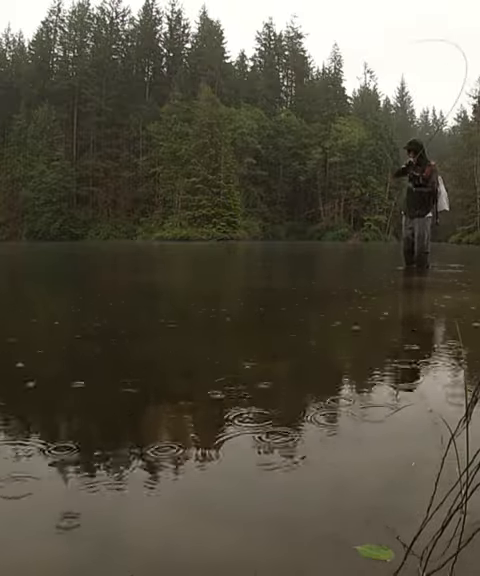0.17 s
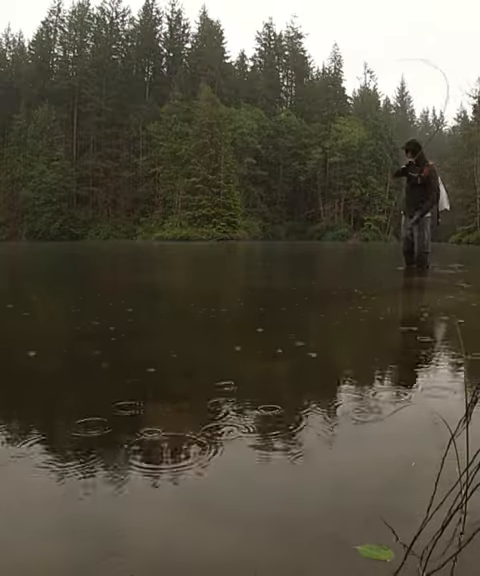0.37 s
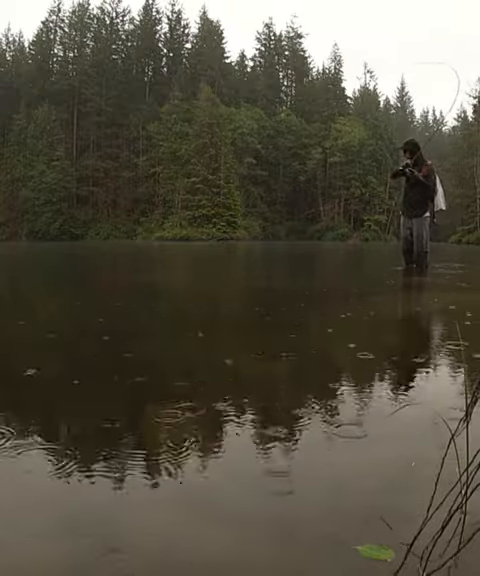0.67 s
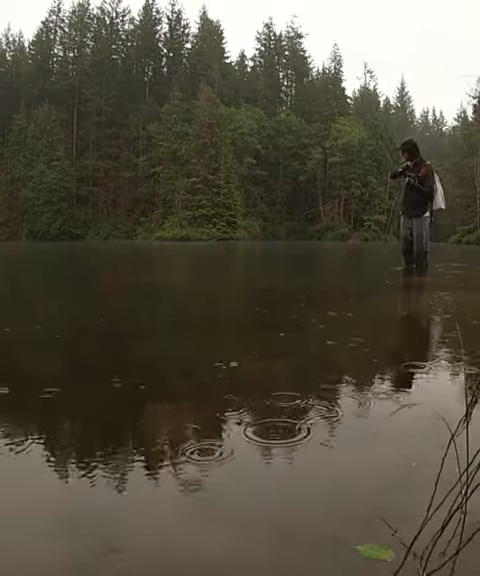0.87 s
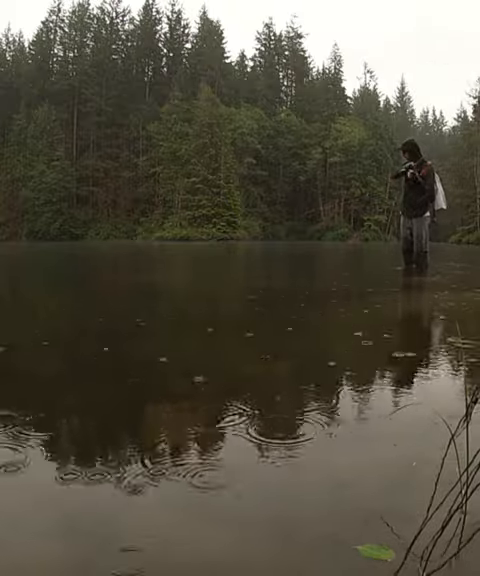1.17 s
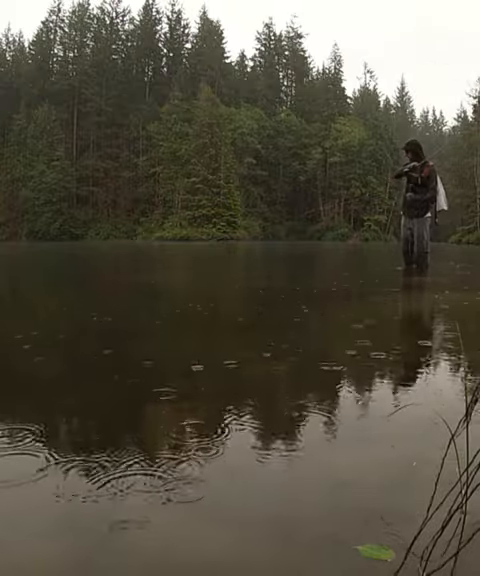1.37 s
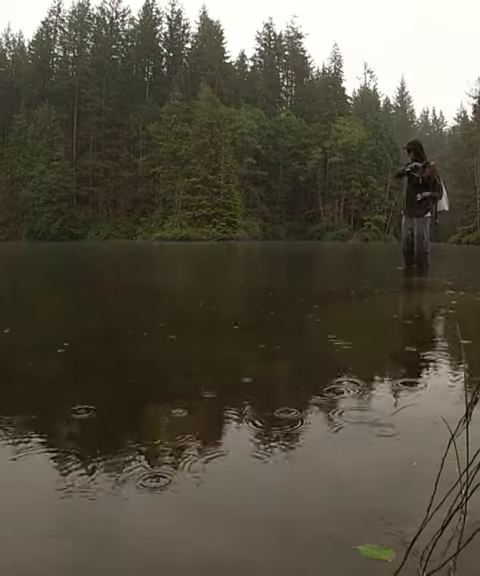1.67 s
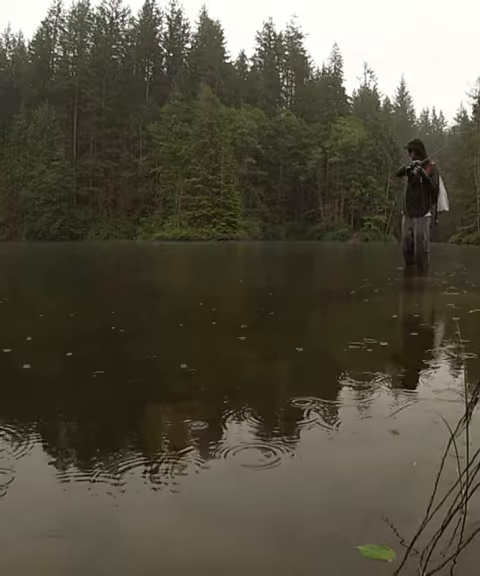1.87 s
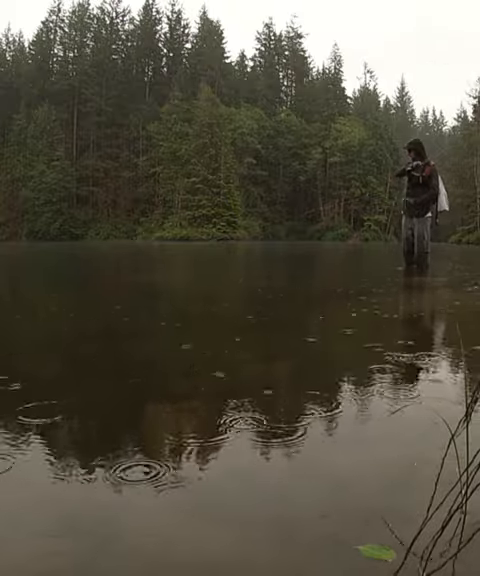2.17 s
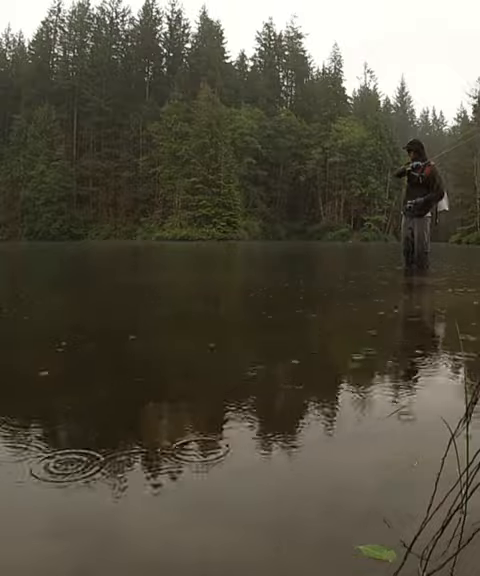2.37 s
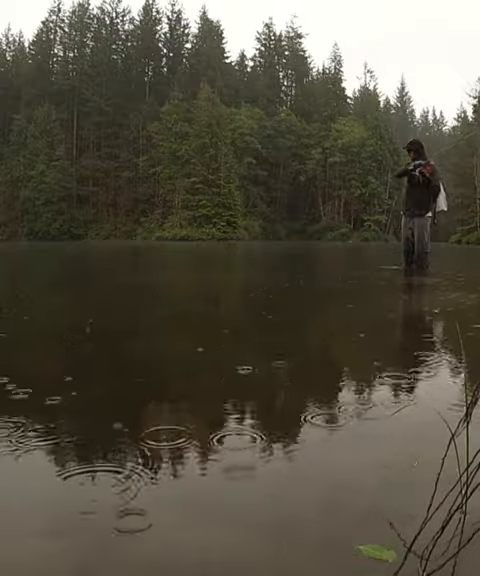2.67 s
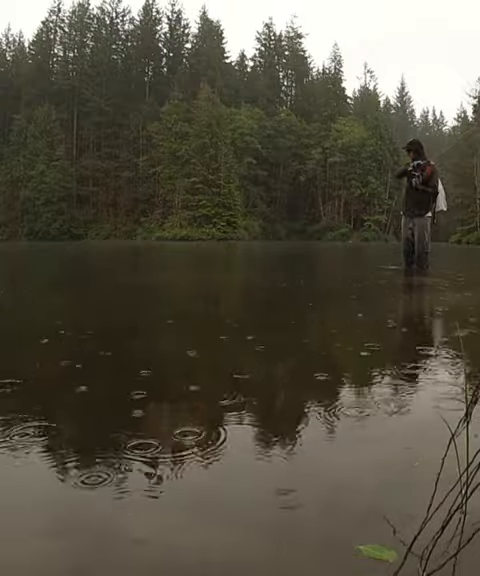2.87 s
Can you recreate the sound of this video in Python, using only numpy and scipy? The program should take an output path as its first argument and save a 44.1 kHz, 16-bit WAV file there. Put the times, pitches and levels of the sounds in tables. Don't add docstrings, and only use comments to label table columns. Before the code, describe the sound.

Close fly line pulled in snapping, hissing bursts and one fast rasping zip beside a rainy lake

```python
import sys
import numpy as np
from scipy import signal
from scipy.fft import rfft, irfft
from scipy.io import wavfile
from scipy.ndimage import uniform_filter1d

SR = 44100
rng = np.random.default_rng(int(sys.argv[2]) if len(sys.argv) > 2 else 0)


def generate_wav(sig):
    pcm = np.round(np.clip(np.atleast_2d(sig).T, -1, 1) * 32767).astype(np.int16)
    wavfile.write(sys.argv[1], SR, pcm)


def to_linear_factor(level_db):
    exponent = np.asarray(level_db, float) / 20
    return 10 ** exponent


N = 133623


def evened(x):
    return x / np.sqrt(np.mean(x ** 2) + 1e-20)


def read(points, hz):
    f, value = np.transpose(points)
    return np.interp(np.log(hz + 1), np.log(f + 1), value, left=value[0], right=value[-1])


def add(mix, s, sound):
    part = mix[..., round(s * SR):][..., :sound.shape[-1]]
    part += sound[..., :part.shape[-1]]


def colour(x, points):
    hz = np.abs(np.fft.fftfreq(2048, 1 / SR))
    octaves_below = np.maximum(np.log2(points[0][0] / (hz + 9)), 0)
    octaves_above = np.maximum(np.log2((hz + 9) / points[-1][0]), 0)
    db = read(points, hz) - 18 * (octaves_below + 3 * octaves_above)
    log = np.log(to_linear_factor(np.maximum(db, -100)))
    taps = np.fft.ifft(np.exp(log - 1j * signal.hilbert(log).imag)).real[:1024]
    return signal.oaconvolve(x, taps / np.linalg.norm(taps))[:len(x)]


def ring(x, hz, width):
    return signal.lfilter(*signal.iirpeak(hz, hz / width, SR), x)


def drift(rate_hz):
    return evened(signal.lfilter(*signal.butter(2, rate_hz, fs=SR), rng.standard_normal(N)))


def wash(points, size, patchy_db, swell_db, same):
    hop = size // 4
    frames, hz = N // hop + 5, np.fft.rfftfreq(size, 1 / SR)
    a, b, c, d, patches = rng.standard_normal((frames, len(hz), 5)).T
    patches = uniform_filter1d(uniform_filter1d(patches, size=8, axis=0), size=8, axis=1)
    swell = evened(uniform_filter1d(rng.standard_normal(frames), size=4))
    same = np.clip(same(hz), -1, 1)[:, None]
    left, other = a + 1j * b, c + 1j * d
    z = np.array([left, same * left + np.sqrt(1 - same ** 2) * other])
    inside = (hz > points[0][0]) & (hz < points[-1][0])
    z *= (inside * to_linear_factor(read(points, hz)))[:, None]
    z *= to_linear_factor(patchy_db * evened(patches) + swell_db * swell)
    return evened(signal.istft(z, nperseg=size, noverlap=size - hop)[1][:, :N])


def space(x, t60):
    t = np.arange(0, t60, 1 / SR)
    tail = rng.standard_normal((2, 2 * SR))[:, :len(t)] * to_linear_factor(-60 * t / t60) * (t > .0015)
    return signal.fftconvolve(x[None], tail / np.linalg.norm(tail[0]), axes=1)[:, :N]


# [f/Hz, likeness 0 to 1]
LIKENESS = [(60, 0.95), (180, 1), (550, 0.71), (1650, 0.34), (4970, 0.91), (15000, 0.092)]
# [f/Hz, level/dB per Hz]
RAIN_SPECTRUM = [(300, 4.5), (520, -6), (1200, -9), (3300, -10.5), (5300, -7.5), (7500, -14), (9000, -24),
                 (15600, -20)]


def rain_hiss():
    return to_linear_factor(-56) * wash(RAIN_SPECTRUM, size=512, patchy_db=0.5, swell_db=1.5,
                           same=lambda hz: read(LIKENESS, hz))


# [f/Hz, level/dB per Hz]
RUMBLE_SPECTRUM = [(12, 1.5), (32, 2), (100, -7), (190, -11), (280, -21.5), (400, -29), (600, -64)]


def wind_rumble():
    return to_linear_factor(-34) * wash(RUMBLE_SPECTRUM, size=4096, patchy_db=0.46, swell_db=1.54,
                           same=lambda hz: read(LIKENESS, hz))


def moan_and_plop():
    t = np.arange(N) / SR
    moan = evened(ring(rng.standard_normal(N), 446, 28)) * np.maximum(1 - t / 0.62, 0)
    plop_s, plop_hz, plop_t60 = .52, 301, 0.048
    u = np.maximum(t - plop_s, 0)
    plop = to_linear_factor(-27.5 - 60 * u / plop_t60) * np.sin(2 * np.pi * plop_hz * u)
    return plop + to_linear_factor(-50.5) * moan


# [f/Hz, level/dB]
SNAP_LOW = [(500, -5), (1000, -7), (1800, -1.5), (3000, -6), (4500, -22)]
SNAP_HIGH = [(3000, -16.5), (4500, -4), (7000, -7.5), (9000, -16), (12000, -17.5), (15500, -30)]


def bursts(table, t60, lift_db, rise_s):
    tail_db, tail_t60 = -24, .03
    low, high, t = np.zeros(N), np.zeros(N), np.arange(1, 1501) / SR
    for s, db, treble_db in table:
        decay = to_linear_factor(-60 * t / t60) + to_linear_factor(tail_db - 60 * t / tail_t60)
        burst = rng.standard_normal(1500) * np.minimum(t / rise_s, 1) * decay
        burst = to_linear_factor(db + lift_db) * burst / np.linalg.norm(burst)
        share = np.minimum(to_linear_factor(treble_db), .995)
        add(low, s, np.sqrt(1 - share ** 2) * burst)
        add(high, s, share * burst)
    return colour(low, SNAP_LOW) + colour(high, SNAP_HIGH)


# [t/s, level/dB, treble/dB]
SNAPS = [(.1447, -30, -1), (.1626, -36, -4), (.1831, -20, -5), (.196, -24, -5), (.2075, -15, -8),
         (.214, -21, -4), (.219, -20, -6), (.224, -23, -5), (.236, -25, -5), (.243, -26, -6),
         (.405, -32, -1), (.4415, -39, -1), (1.347, -27, -4), (1.3654, -22, -5), (1.371, -22, -4),
         (1.376, -25, -5), (1.3855, -22, -3), (1.392, -26, -4), (1.398, -25, -6), (1.404, -25, -5),
         (1.41, -26, -4), (1.574, -31, -7), (1.58, -23, 0), (1.5822, -13, 0), (1.586, -17, -2),
         (2.3268, -6, -22), (2.871, -35, -10), (2.876, -36, -14), (2.430, -41, -6), (2.836, -35, -1),
              (2.885, -33, -9), (2.892, -32, -12), (2.901, -29, -10), (2.910, -24, -6), (2.919, -24, -6),
              (2.923, -27, -5), (2.930, -23, -4), (2.935, -28, -4), (2.9425, -18, -5), (2.949, -27, -6),
              (2.976, -34, -1), (2.999, -29, -7)]


def line_snaps():
    return bursts(SNAPS, t60=.002, lift_db=10.65, rise_s=.0001)


# [t/s, length/s, level/dB, low scrape level/dB]
SLIDES = [(.204, .024, -45, -33), (.226, .03, -47, -38), (.4, .055, -54, -55), (.25, .17, -43, -58),
          (1.364, .056, -46, -39), (1.41, .165, -42, -58), (1.568, .026, -41, -46), (2.86, .045, -62, -49),
          (2.912, .048, -45, -43), (2.96, .1, -43, -53), (.83, .07, -58, -64), (1.62, .07, -58, -64),
          (1.99, .07, -57, -62), (1.27, .06, -60, -66), (2.4, .05, -60, -62)]
# [f/Hz, level/dB per Hz]
SLIDE_SPECTRUM = [(1000, -14.5), (2300, -18), (2900, -5), (4800, -5.5), (7600, -9.5), (9000, -40),
                  (15000, -57)]
# [f/Hz, width/Hz, level/dB]
GUIDE_RINGS = [(4183, 50, -7), (4920, 430, -3)]


def slides():
    hiss = wash(SLIDE_SPECTRUM, size=256, patchy_db=2.5, swell_db=1.2, same=np.ones_like)[0]
    singing = np.zeros(N)
    for hz, width, db in GUIDE_RINGS:
        tone = evened(ring(rng.standard_normal(N), hz, width))
        singing += to_linear_factor(db + 4.25 * drift(24)) * tone
    hiss = evened(hiss + singing)
    scrape = evened(colour(rng.standard_normal(N), SNAP_LOW))
    high, low = np.zeros(N), np.zeros(N)
    for s, length, db, low_db in SLIDES:
        u = np.arange(0, 1, 1 / (length * SR))
        shape = np.clip(np.minimum(u, 1 - u) / 0.053, 0, 1)
        add(high, s, to_linear_factor(db + 4 * u) * shape)
        add(low, s, to_linear_factor(low_db) * shape)
    flutter_db = 1
    return hiss * high * to_linear_factor(flutter_db * drift(40)) + scrape * low * to_linear_factor(flutter_db * drift(150))


# [t/s, length/s, f/Hz, level/dB]
SQUEAKS = [
    (0.285, .014, 4100, -37),
    (0.37, 0.02, 4160, -41),
    (1.462, 0.015, 4170, -37),
    (1.479, .012, 4780, -39),
    (1.515, 0.032, 4830, -41),
    (2.835, 0.0057, 4360, -37.5),
    (2.973, .01, 4770, -35),
    (2.994, 0.014, 2500, -39),
]


def squeaks():
    out, waver = np.zeros(N), 1 + 0.013 * drift(200)
    for s, length, hz, db in SQUEAKS:
        bent = hz * waver[round(s * SR):][:round(length * SR)]
        add(out, s, to_linear_factor(db) * np.hanning(len(bent)) * np.sin(2 * np.pi * np.cumsum(bent) / SR))
    return out


# [t/s, f/Hz, level/dB]
STROKES = [
    [(.444, 2900, -60), (.463, 2700, -44), (.476, 2790, -50), (.487, 2950, -44), (.496, 2880, -60)],
    [(.497, 2195, -62), (.53, 2235, -48), (.556, 2195, -45), (.577, 2250, -39), (.606, 2360, -49),
     (.615, 2490, -38), (.64, 2130, -54)],
    [(.595, 2150, -62), (.61, 2080, -53), (.66, 2080, -54), (.7, 2170, -48), (.724, 2250, -43),
     (.742, 2300, -60)],
    [(1.014, 2770, -62), (1.03, 2900, -44), (1.046, 2950, -42), (1.062, 2900, -41), (1.1, 2945, -38),
     (1.108, 2900, -56)],
    [(1.056, 3050, -56), (1.068, 3140, -45), (1.12, 3160, -42), (1.14, 3050, -42), (1.157, 2870, -37),
     (1.178, 2755, -38), (1.195, 2720, -56)],
    [(1.16, 3050, -58), (1.178, 3045, -40), (1.192, 2915, -36), (1.208, 2830, -56)],
    [(1.125, 2150, -66), (1.165, 1760, -58), (1.19, 1830, -55), (1.225, 2150, -55), (1.24, 2350, -68)],
    [(.512, 2560, -64), (.523, 2480, -50), (.532, 2350, -62)],
    [(1.16, 3580, -68), (1.19, 3750, -59), (1.215, 4200, -64)],
]
# [delay/s, level/dB]
ECHOES = [(0.062, -12)]


def bird():
    song, warble = np.zeros(N), 1 + .003 * drift(120)
    for s, hz, db in map(np.transpose, STROKES):
        t = np.arange(s[0], s[-1], 1 / SR)
        hz = uniform_filter1d(np.interp(t, s, hz), size=200)
        hz = hz * warble[round(s[0] * SR):][:len(t)]
        loudness = to_linear_factor(np.interp(t, s, db)) * signal.windows.tukey(len(t), .1)
        add(song, s[0], loudness * np.sin(2 * np.pi * np.cumsum(hz) / SR))
    song, t = song * to_linear_factor(2.2 * drift(110)), np.arange(N) / SR
    echoes = sum(to_linear_factor(db) * np.interp(t - s, t, song) for s, db in ECHOES)
    return song + echoes + to_linear_factor(-7) * space(song, t60=1.6)


# [t/s, level/dB, treble/dB]
DROPS = [
    (.552, -56, 0),
    (.686, -75, 0),
    (.873, -47, -1),
    (.996, -54, -4),
    (1.631, -53, 0),
    (1.649, -50, 0),
    (1.665, -52, 0),
    (2.058, -51.5, -2),
    (2.82, -53, -2),
    (1.956, -69, -1.5),
]


def rain_ticks():
    return bursts(DROPS, t60=.04, lift_db=28.7, rise_s=0.0014)


# [t/s, f/Hz]
SLIP_RATE = [
    (2.069, 142),
    (2.12, 171),
    (2.1235, 415),
    (2.1664, 570),
    (2.1855, 480),
    (2.193, 365),
    (2.232, 250),
    (2.278, 176),
    (2.3165, 88),
]
# [t/s, level/dB, fizz share/dB]
GRIP = [
    (2.069, -43.5, -8),
    (2.097, -29, -8.5),
    (2.119, -22.5, -15),
    (2.125, -21, -11.5),
    (2.166, -17.5, -21.5),
    (2.19, -20.5, -17),
    (2.22, -24.5, -5.5),
    (2.27, -28.5, -4.5),
    (2.316, -35, 2),
]
# [f/Hz, level/dB]
SLIP_EARLY = [(150, -41), (500, -12.5), (1000, -9.5), (1500, -1.5), (2600, 2.5), (3400, -11), (6000, -26),
              (13000, -44)]
SLIP_LATE = [(150, 7.5), (500, -15.5), (1000, -2.5), (1900, 2.5), (2800, 0), (3600, -10.5), (6000, -9),
             (13000, -43.5)]
# [f/Hz, level/dB per Hz]
FIZZ = [(700, -4), (1700, 5.5), (3300, -0.5), (5500, -3), (8000, -13), (13000, -23)]


def zip_rasp():
    (s, rate), (when, db, fizz_db) = np.transpose(SLIP_RATE), np.transpose(GRIP)
    t = np.arange(N) / SR
    on = (t > s[0]) & (t < s[-1])
    rate = np.interp(t, s, rate)
    turns = .99 + np.cumsum(on * rate * (1 + .018 * drift(300))) / SR
    slips = (np.diff(np.floor(turns), prepend=0) > 0) * to_linear_factor(1.1 * rng.standard_normal(N))
    slips = slips * to_linear_factor(np.interp(t, when, db)) * np.sqrt(SR / rate)
    turn_s, turn_span_s = 2.185, 0.049
    late = np.clip(.5 + (t - turn_s) / turn_span_s, 0, 1)
    bounce_s, bounce_db = .0017, -13
    hits = slips + to_linear_factor(bounce_db) * late * np.interp(t - bounce_s, t, slips)
    clicks = colour(late * hits, SLIP_LATE) + colour((1 - late) * hits, SLIP_EARLY)
    puff = np.exp(-np.arange(800) / SR / .003)
    fizz_hits = slips * to_linear_factor(np.interp(t, when, fizz_db))
    gate = signal.oaconvolve(fizz_hits, puff / np.linalg.norm(puff))[:N]
    return clicks + colour(gate * rng.standard_normal(N), FIZZ)


# [f/Hz, level/dB]
LEAN = [(3000, 0.9), (6000, 3.5)]
# [f/Hz, side level/dB]
APART = [(400, -10.5), (2500, -10.5), (5000, -12.5), (12000, -0.5)]


def place_line(line):
    hz = np.fft.rfftfreq(N, 1 / SR)
    lean, side = to_linear_factor(read(LEAN, hz) / 2), 1j * to_linear_factor(read(APART, hz))
    sway = irfft(rfft(line) * side, N) * (0.71 + 0.9 * drift(24))
    pair = irfft(rfft([line + sway, line - sway]) * [lean, 1 / lean], N)
    return pair + to_linear_factor(-15) * space(line, t60=.04)


def scene():
    near = line_snaps() + slides() + squeaks() + rain_ticks() + zip_rasp()
    return rain_hiss() + wind_rumble() + moan_and_plop() + place_line(near) + bird()


def top_cut(x):
    return signal.sosfilt(signal.butter(12, 15700, fs=SR, output="sos"), x)


# [f/Hz, level/dB]
MIC = [(8000, 1), (9900, 1.5), (10900, -2.5), (12200, 4), (13000, -7.5), (15600, -9)]


def record(dry):
    heard = irfft(rfft(dry) * to_linear_factor(read(MIC, np.fft.rfftfreq(N, 1 / SR))), N)
    return top_cut(heard)


dry = scene()
out = record(dry)
generate_wav(out)
```